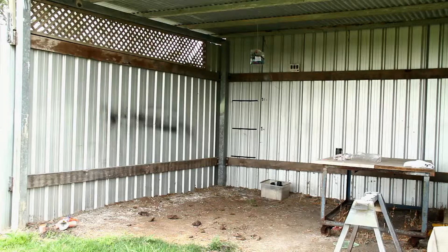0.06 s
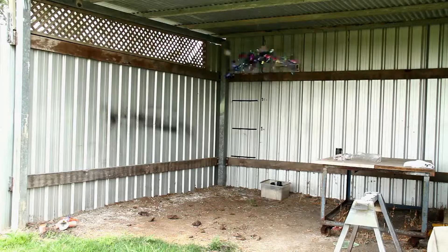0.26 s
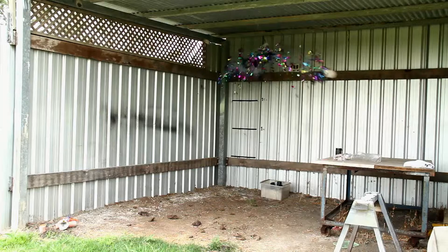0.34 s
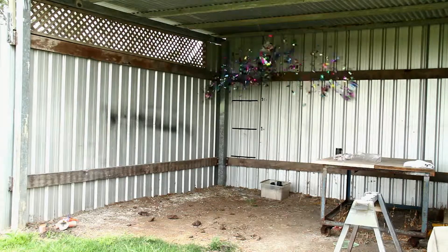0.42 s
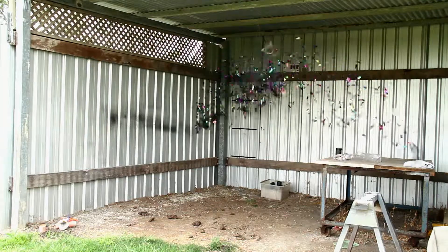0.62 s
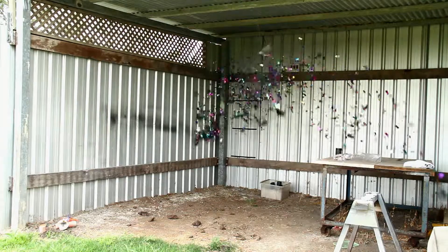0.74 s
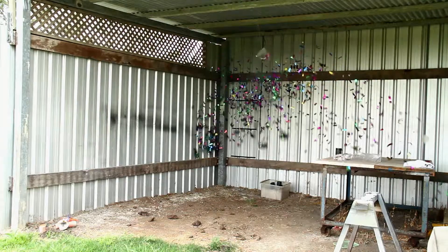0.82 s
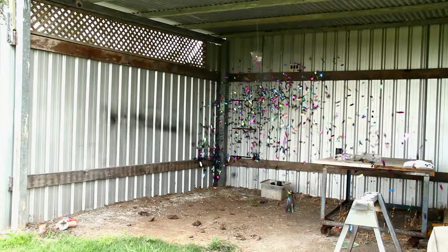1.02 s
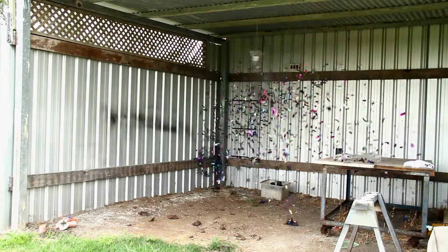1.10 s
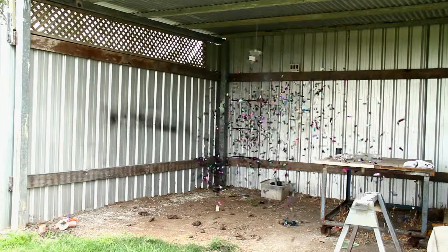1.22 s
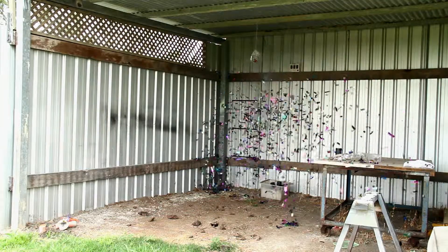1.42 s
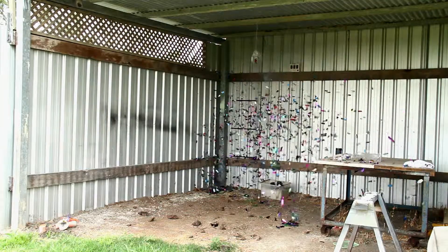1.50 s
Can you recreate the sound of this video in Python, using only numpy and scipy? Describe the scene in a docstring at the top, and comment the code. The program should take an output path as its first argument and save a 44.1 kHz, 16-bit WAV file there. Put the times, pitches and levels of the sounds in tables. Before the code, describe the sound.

A confetti charge bangs in a ringing metal shed, then confetti rustles down.

```python
"""A confetti charge bursts in an open corrugated-steel shed: the casing tears and the blast overloads the mic.
The shed echoes and its wall sheets ring, while the recorder's gain ducks and recovers within half a second.
As the gain comes back, a soft mid-pitched swell rises in the ringing; confetti rustles and sifts down.
Then clumps and hard scraps of casing land on the table and the dirt floor, over a low bed of outdoor air."""
import sys
import numpy as np
from scipy import signal
from scipy.fft import rfft, irfft
from scipy.io import wavfile
from scipy.ndimage import uniform_filter1d, minimum_filter1d

SR = 44100
rng = np.random.default_rng(int(sys.argv[2]) if len(sys.argv) > 2 else 0)


def persist_wave(psi):
    """Save psi, clipped to +-1, as 16-bit WAV."""
    counts = np.round(np.clip(psi, -1, 1) * 32767).astype(np.int16)
    wavfile.write(sys.argv[1], SR, np.atleast_2d(counts).T)


N = 68355
T = np.arange(N) / SR
HZ = np.maximum(np.arange(N + 1) * SR / (2 * N), 1)
BANG_S = .2012

# Tone of the blast with its first reflections: freq_hz, relative_db
BLAST_EQ = [(30, -19), (130, -9), (250, 1.5), (480, 1.5), (690, 4.5), (830, -9), (1000, 2), (1220, 6.5),
            (1450, -10.5), (1900, -7), (4000, -19), (8000, -19), (14000, -38)]
def burst():
    """The casing tears, then a short roar escapes with a moment of under-pressure behind its front."""
    tear_s, suction_delay_s, suction_width_s = .005, .0042, .0015
    tear_ramp = np.clip(1 + (T - BANG_S) / tear_s, 0, 1) * (T < BANG_S)
    tear = shaped(rng.standard_normal(N), hump(hz=5500, octaves=1.4)) * tear_ramp
    roar = noise(BLAST_EQ) * swell(BANG_S, rise_s=.00027, decay_s=.0021, hold_s=.0076)
    suction = -np.exp(-((T - BANG_S - suction_delay_s) / suction_width_s) ** 2)
    return from_db(-16.5) * tear + from_db(13) * roar + from_db(6) * suction


# Tone of the shed's reverb: freq_hz, relative_db
SHED_EQ = [(40, -41), (130, -18), (250, -8), (450, 0), (750, 0.5), (1000, 1.5), (1500, -3.5), (2500, -5),
           (4500, -11.5), (8000, -17), (14000, -17)]
# Length of its tail: freq_hz, t60_s
SHED_DECAY = [(60, 0.46), (220, 0.7), (500, 0.93), (1000, 1.45), (2000, 0.92), (4000, 0.84), (8000, 0.55),
              (14000, 0.36)]
def shed_response():
    """Dense echoes fill the shed, each third of an octave dying at its own rate."""
    spectrum, out = rfft(noise(SHED_EQ)), np.zeros(N)
    hz = np.maximum(np.arange(len(spectrum)) * SR / N, 20)
    band = np.round(3 * np.log2(hz))
    for k in np.unique(band):
        t60_s = at_hz(SHED_DECAY, 2 ** (k / 3))
        out += irfft(spectrum * (band == k), N) * np.exp(-np.log(1000) * T / t60_s)
    return out


def bang_echoes(room):
    """The near walls throw the bang back hard, then the shed's tail takes over."""
    tail_db, early_db, early_decay_s = -6.5, 2.5, .047
    echoes = room * (from_db(tail_db) + from_db(early_db) * np.exp(-T / early_decay_s))
    return np.concatenate([np.zeros(int(BANG_S * SR)), echoes])[:N]


# Ringing modes of the steel: pitch_hz, relative_db, t60_s
SHEET_MODES = [(518, -33, 0.43), (681, -19, 0.77), (751, -34.5, 8.3), (760, -31, 1.44), (783, -35, 5.1),
               (830, -29.5, 2.6), (842, -19.5, 0.7), (930, -15, 1.07), (981, -14.5, 0.85),
               (1004, -17, 1.13), (1087, -16, 1.0), (1208, -25, 0.8), (1864, -24.5, 0.53)]
# Hits on the steel, first the blast, then the confetti cloud: peak_s, gain_db, rise_s
SHEET_HITS = [(0.2, 2, 0.00087), (.59, -18, 0.025)]
def steel_sheets():
    """The wall and roof sheets ring after each hit, wavering as neighbouring panels beat."""
    waver_depth, waver_cutoff_hz = .59, 12
    out = np.zeros(N)
    for pitch_hz, relative_db, t60_s in SHEET_MODES:
        waver = 1 + waver_depth * shaped(rng.standard_normal(N), 1 / (1 + (HZ / waver_cutoff_hz) ** 2))
        for peak_s, gain_db, rise_s in SHEET_HITS:
            tone = np.sin(2 * np.pi * (pitch_hz * T + rng.random()))
            envelope = swell(peak_s, rise_s, t60_s / np.log(1000))
            out += from_db(relative_db + gain_db) * waver * tone * envelope
    return out


# Casing scraps striking: start_s, peak_db, pitch_hz
SCRAP_HITS = [(0.9525, -5, 7660), (0.963, -13, 7200), (1.0939, -3, 3800)]
def casing_scraps():
    """Hard scraps hit with a dry snap: four contacts, each sooner and weaker than the last."""
    first_bounce_s, per_bounce_db = .00045, -2
    out, bounce = np.zeros(N), np.arange(4)
    for start_s, peak_db, pitch_hz in SCRAP_HITS:
        contact_s = start_s + first_bounce_s * np.sqrt(bounce)
        contacts = np.zeros(N)
        contacts[(contact_s * SR).astype(int)] = from_db(per_bounce_db * bounce) * (-1) ** bounce
        snap = shaped(contacts, 1j * hump(pitch_hz, octaves=.89))
        out += from_db(peak_db) * snap / np.abs(snap).max()
    return out


# Bright, foil-like tone of the hiss and the rustle: freq_hz, relative_db
FOIL_EQ = [(60, -13), (200, -8.5), (600, -5), (1500, -6), (3000, -3.5), (6000, -1.5), (9500, 0),
           (13500, 3.5)]
# First a soft mid-pitched swell, then confetti clumps; hiss and low end are set against the body:
# peak_s, level_db, rise_s, decay_s, pitch_hz, width_octaves, hiss_db, low_db
SWELL_AND_CLUMPS = [(0.648, -32.5, 0.037, 0.082, 1500, 0.49, -3, -8.5),
                    (0.884, -40.5, .012, 0.033, 1600, 0.51, 14, -9),
                    (0.966, -24.5, 0.0071, 0.038, 5600, 0.3, 1.5, -34),
                    (1.029, -25, 0.006, 0.013, 3360, 2, 8, -8),
                    (1.112, -17.5, 0.01, 0.016, 3070, 0.92, -13, -27),
                    (1.119, -23, 0.033, 0.055, 2450, 1.1, -7, -11.5),
                    (1.273, -29.5, 0.0017, 0.045, 1300, 0.79, -9, -9),
                    (1.357, -31.5, 0.029, 0.035, 1240, 2.7, 6, -4.5)]
def swell_and_clumps():
    """A soft swell rises in the shed's ringing; later, wads land with a slap, a hiss and a thud."""
    out = np.zeros(N)
    for peak_s, level_db, rise_s, decay_s, pitch_hz, width_octaves, hiss_db, low_db in SWELL_AND_CLUMPS:
        body = shaped(grains(per_s=5400, spread_db=-1.5), hump(pitch_hz, width_octaves))
        hiss = shaped(grains(per_s=5400, spread_db=-1.5), from_db(at_hz(FOIL_EQ, HZ)))
        low_end = shaped(rng.standard_normal(N), hump(hz=292, octaves=.61))
        layers = body + from_db(hiss_db) * hiss + from_db(low_db) * low_end
        out += from_db(level_db) * swell(peak_s, rise_s, decay_s) * layers
    return out


# Fader curve of the rustle: time_s, level_db
RUSTLE_FADER = [(.33, -44), (.38, -35), (.44, -43), (.51, -39), (.54, -28.5), (.6, -34.5), (.66, -30.5),
                (.72, -32.5), (.8, -32), (.89, -25), (.94, -26), (1.07, -25.5), (1.2, -31.5), (1.3, -34.5),
                (1.44, -34), (1.55, -36.5)]
def confetti_rustle():
    """Loose flakes brush the walls and sift down."""
    time_s, level_db = np.transpose(RUSTLE_FADER)
    fader = from_db(np.interp(T, time_s, level_db)) * (T > time_s[0])
    return fader * shaped(grains(per_s=7000, spread_db=2), from_db(at_hz(FOIL_EQ, HZ)))


# Tone of the outdoor bed: freq_hz, relative_db
AIR_EQ = [(25, -23), (45, -8), (70, 0.5), (110, -3.5), (170, -5.5), (360, -4), (550, -4), (780, -7.5),
          (1400, -12.5), (3000, -22.5), (7000, -27), (13800, -31)]
def outdoor_air():
    """A quiet, steady rumble from outside the shed."""
    return from_db(-42) * noise(AIR_EQ)


def from_db(db):
    """Decibels to gain."""
    return 10 ** (np.asarray(db) / 20)


def rms_one(x):
    """Scale to unit rms."""
    return x / np.sqrt(np.mean(x ** 2) + 1e-20)


def at_hz(points, hz):
    """Read a table on a log-frequency axis."""
    freq_hz, values = np.transpose(points)
    return np.interp(np.log(hz), np.log(freq_hz), values)


def shaped(x, gain):
    """EQ a signal, then scale it to unit rms."""
    return rms_one(irfft(rfft(x, 2 * N) * gain)[:N])


def noise(eq):
    """Steady noise through an EQ table."""
    return shaped(rng.standard_normal(N), from_db(at_hz(eq, HZ)))


def hump(hz, octaves):
    """A broad resonance."""
    return 1 / (1 + (np.log2(HZ / hz) / octaves) ** 2 / 2)


def grains(per_s, spread_db):
    """Tiny clicks of uneven size at random moments."""
    sizes = from_db(spread_db * np.minimum(rng.exponential(1, N), 5))
    return (rng.random(N) < per_s / SR) * sizes * rng.choice([-1, 1], N)


def swell(peak_s, rise_s, decay_s, hold_s=0):
    """Rise to a peak, hold, then die away."""
    return np.exp(-(np.minimum(T - peak_s, 0) / rise_s) ** 2 - np.maximum(T - peak_s - hold_s, 0) / decay_s)


def scene():
    """Mix the bang, the shed's answer, the falling debris and the outdoor air in mono."""
    room = shed_response()
    aftermath = confetti_rustle() + swell_and_clumps() + casing_scraps()
    reverb = from_db(-13.5) * signal.fftconvolve(aftermath, room / np.sqrt(np.sum(room ** 2)))[:N]
    return (burst() + bang_echoes(room) + steel_sheets() + aftermath + reverb + outdoor_air())[None]


def gain_control(x):
    """Loud sound turns the gain down; it holds, then climbs back."""
    threshold_db, slope, release_db_per_s = -12, .59, 78
    lag_s, attack_s, hold_s = .009, .007, .23
    level_db = 10 * np.log10(np.abs(uniform_filter1d(x ** 2, size=256)) + 1e-12)
    cut_db = slope * np.maximum(level_db - threshold_db, 0)
    half_hold = int(hold_s * SR / 2)
    held_db = -minimum_filter1d(-cut_db, 2 * half_hold + 1, origin=half_hold, mode="constant")
    duck_db = np.maximum.accumulate(held_db + release_db_per_s * T) - release_db_per_s * T
    pole = np.exp(-1 / (attack_s * SR))
    smooth_db = signal.lfilter([1 - pole], [1, -pole], duck_db)
    return from_db(-np.interp(T - lag_s, T, smooth_db))


def record(dry):
    """The microphone soft-clips, the gain ducks and the top end is cut."""
    cutoff_hz = 14100
    clipped = dry[0] / (1 + dry[0] ** 6) ** (1 / 6)
    lowpass = signal.ellip(12, .1, 80, cutoff_hz, fs=SR, output="sos")
    return signal.sosfilt(lowpass, clipped * gain_control(clipped))[None]


dry = scene()
out = record(dry)
persist_wave(out)
```